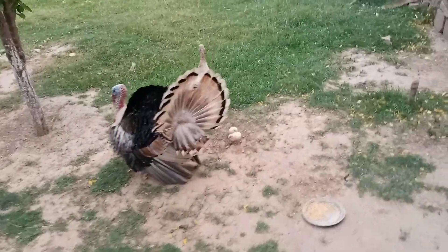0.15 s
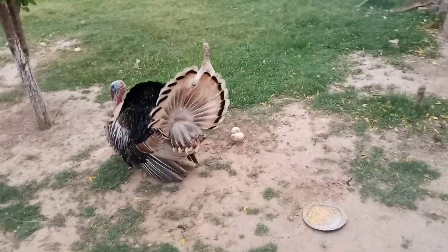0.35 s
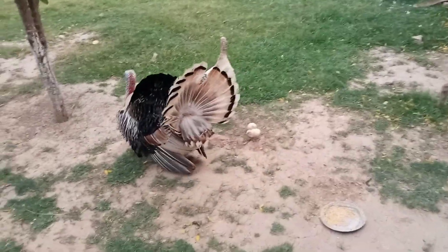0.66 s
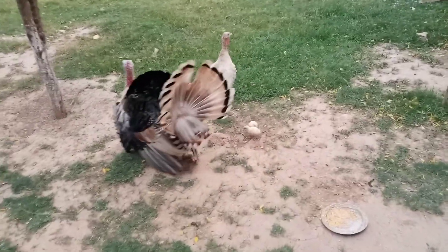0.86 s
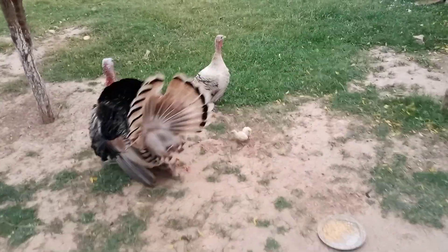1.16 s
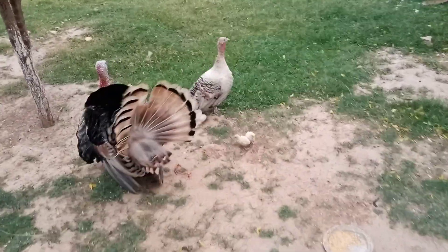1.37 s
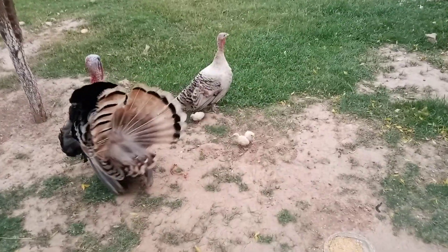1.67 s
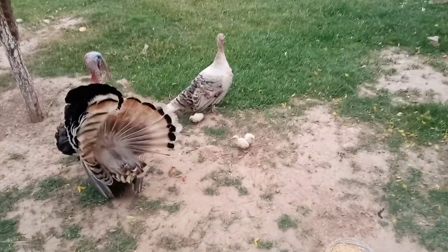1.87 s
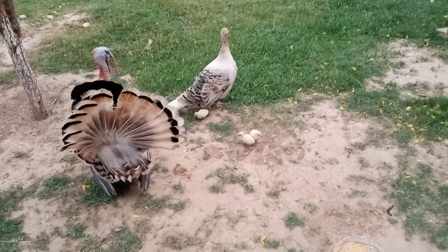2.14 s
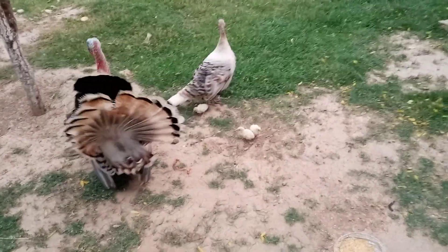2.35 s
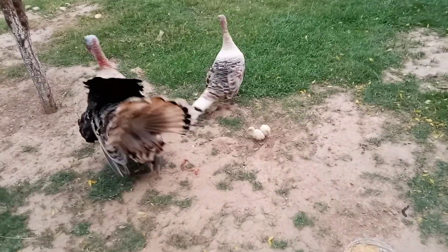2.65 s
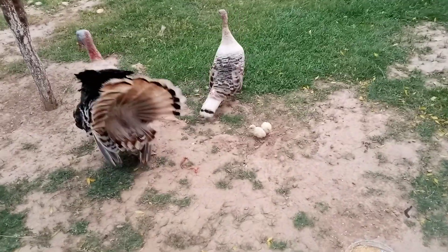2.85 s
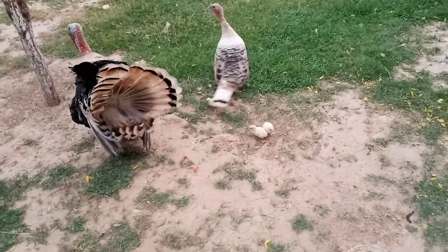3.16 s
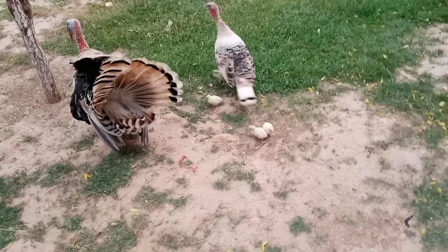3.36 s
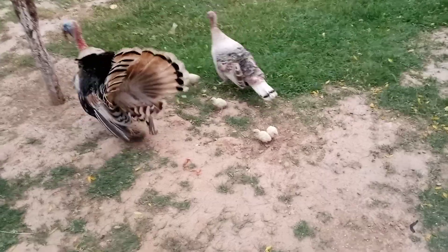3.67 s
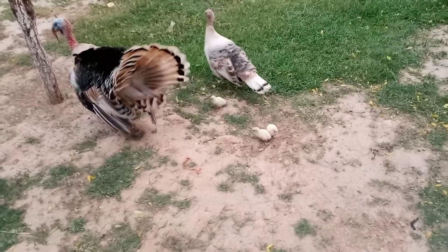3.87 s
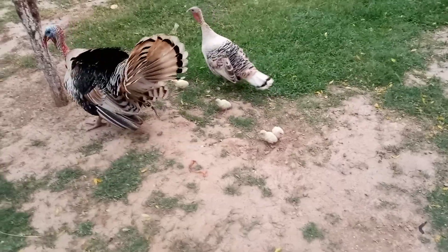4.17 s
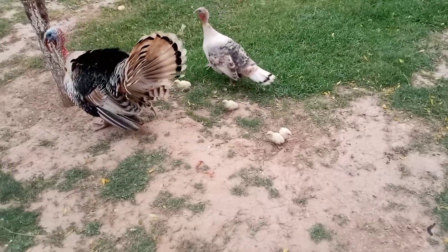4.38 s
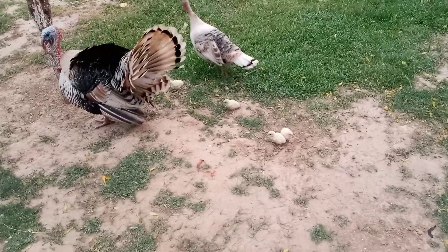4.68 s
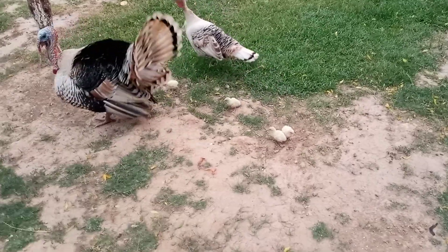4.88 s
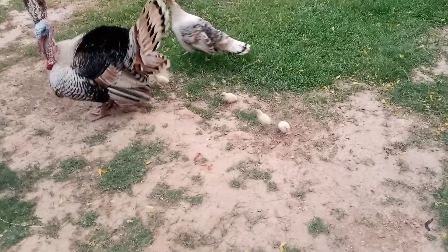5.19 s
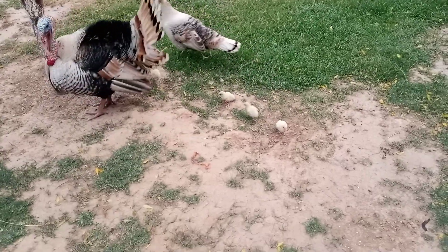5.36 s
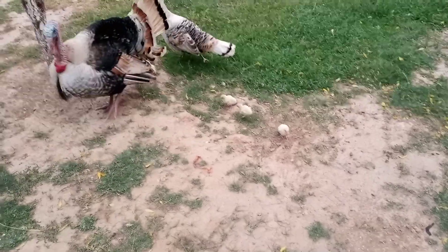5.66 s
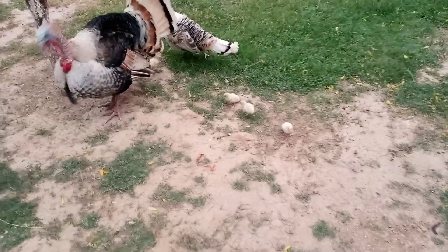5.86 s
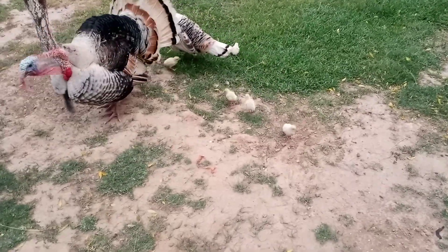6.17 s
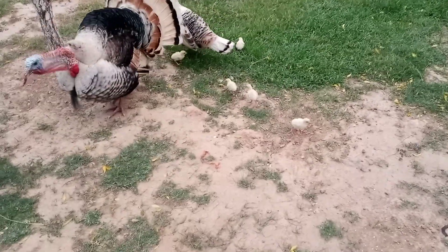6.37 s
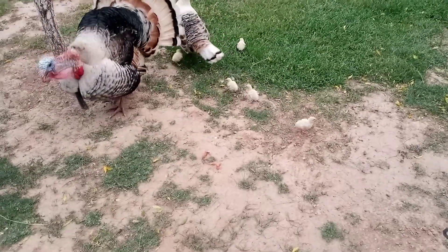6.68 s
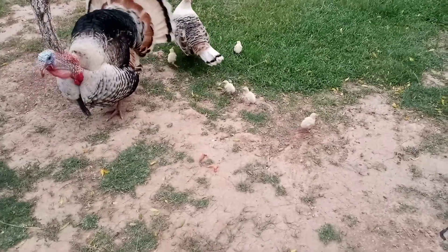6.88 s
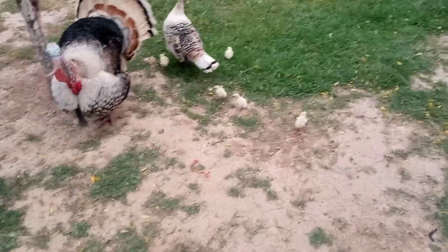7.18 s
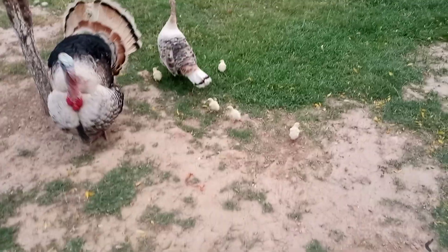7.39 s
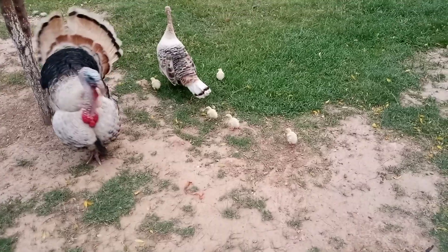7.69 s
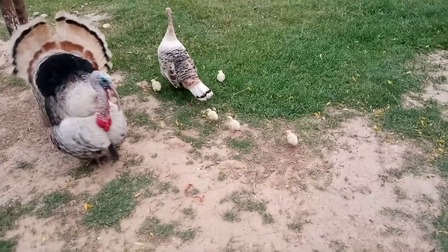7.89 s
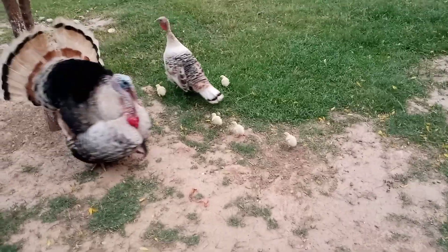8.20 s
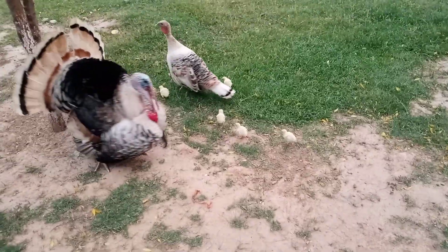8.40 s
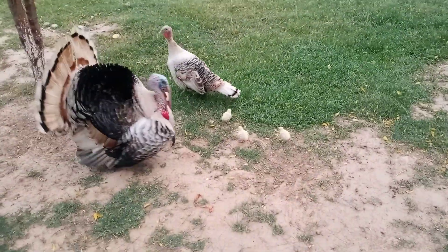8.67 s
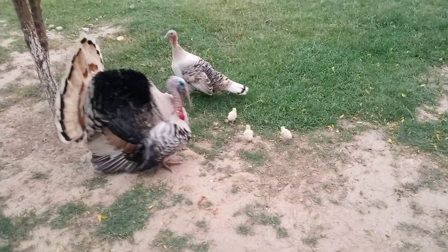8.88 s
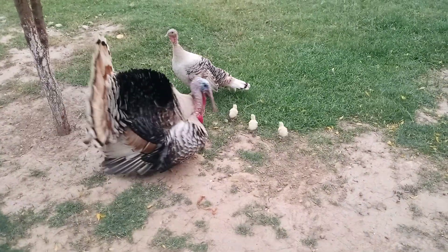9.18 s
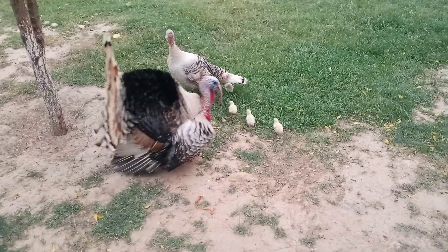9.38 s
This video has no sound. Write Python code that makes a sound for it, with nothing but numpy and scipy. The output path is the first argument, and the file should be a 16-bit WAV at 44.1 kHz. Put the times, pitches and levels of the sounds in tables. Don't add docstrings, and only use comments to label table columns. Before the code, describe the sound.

Farmyard hush with faint bird chirps and wind buffets; chicks peep, a hen yelps faster, a turkey gobbles loudly once, then scattered yelps follow.

```python
import sys
import numpy as np
from scipy import signal
from scipy.fft import rfft, irfft, next_fast_len
from scipy.io import wavfile
from scipy.ndimage import uniform_filter1d, map_coordinates

SR = 44100
rng = np.random.default_rng(int(sys.argv[2]) if len(sys.argv) > 2 else 0)


def pcm_store(signal):
    levels = np.round(np.clip(np.atleast_2d(signal), -1, 1) * 32767)
    wavfile.write(sys.argv[1], SR, levels.astype(np.int16).T)


def level_to_linear(level):
    exponent = np.asarray(level, float) / 20
    return 10 ** exponent


N = 420713


def unit(x):
    return x / np.sqrt(np.mean(np.abs(x) ** 2) + 1e-20)


def along(points, hz):
    f, v = np.transpose(points)
    return np.interp(np.log(hz + 1), np.log(f + 1), v)


def curves(rows, start=0, count=N):
    s, *columns = np.transpose(rows)
    t = (start + np.arange(count)) / SR
    return [np.interp(t, s, column) for column in columns]


def wobble(rate, count=N):
    knots = rng.standard_normal(int(count * rate / SR) + 4)
    return map_coordinates(knots, [1 + np.arange(count) * rate / SR])


def cycles(hz):
    return 2 * np.pi * np.cumsum(hz) / SR


def noise(spectrum):
    m = next_fast_len(N)
    hz = np.fft.rfftfreq(m, 1 / SR)
    inside = (hz >= spectrum[0][0]) & (hz <= spectrum[-1][0])
    white = rfft(rng.standard_normal(m))
    return unit(irfft(white * level_to_linear(along(spectrum, hz)) * inside, m)[:N])


def swells(rows):
    t = np.arange(N) / SR
    total = np.zeros(N)
    for s, rise, db, t60 in rows:
        total += level_to_linear(db - np.where(t < s, 20 * (s - t) / rise, 60 * (t - s) / t60))
    return total


def puffs(rows, spectrum):
    return noise(spectrum) * swells(rows)


def note(rows, edge):
    start, count = round(rows[0][0] * SR), round((rows[-1][0] - rows[0][0]) * SR)
    t = np.arange(count) / SR
    return start, np.clip(np.minimum(t, t[::-1]) / edge, 0, 1), curves(rows, start, count)


def bells(rows):
    lead, rise, fall = .2, .72, 1.15
    for s, width, db, *rest in rows:
        span = slice(round((s - 4 * width) * SR), round((s + 4 * width) * SR))
        u = (np.arange(span.start, span.stop) / SR - s) / width
        gain = level_to_linear(db) * np.exp(-.5 * ((u + lead) / np.where(u < -lead, rise, fall)) ** 2)
        yield span, u, gain, rest


def partial(phase, rough, smear_hz):
    fuzz = wobble(smear_hz, len(phase)) + 1j * wobble(smear_hz, len(phase))
    return np.real((np.sqrt(2 - 2 * rough) + np.sqrt(rough) * fuzz) * np.exp(1j * phase))


def whistles(tables, rough, smear_hz, edge):
    out = np.zeros(N)
    for rows in tables:
        start, window, (hz, db) = note(rows, edge)
        phase = cycles(hz * (1 + .007 * wobble(90, len(hz))))
        out[start:start + len(hz)] += window * level_to_linear(db) * partial(phase, rough, smear_hz)
    return out


def glides(rows):
    return [[(s, first, db), (s + length, last, db)] for s, length, first, last, db in rows]


# frequency in Hz, t60 in seconds.
WALL_DECAY = [(500, 0.38), (2000, 0.4), (8000, 0.2)]


def walls(x, delay):
    hz, t, z = signal.stft(rng.standard_normal(SR // 2), SR, nperseg=256)
    decay = level_to_linear(-60 * t / along(WALL_DECAY, hz)[:, None])
    tail = signal.istft(z * decay, SR, nperseg=256)[1]
    delayed = np.pad(x, (round(delay * SR), 0))
    return signal.fftconvolve(delayed, tail / np.linalg.norm(tail))[:N]


# time in seconds, hush in dB, treble in dB.
YARD_LEVEL = [(0, -55.5, -98), (.49, -54, -92), (.52, -55.5, -76), (5.4, -56.5, -74), (9.54, -55.5, -73)]
# frequency in Hz, density in dB per Hz.
HUSH_COLOUR = [(24, -31.5), (40, -18), (69, -3), (134, 0), (501, -5), (756, -4.5), (1350, -6), (2330, -3.5),
               (3150, -9), (4170, -8.5), (7000, -14.5), (9100, -73), (15400, -120)]
# frequency in Hz, level in dB.
TREBLE_COLOUR = [(6500, 5.5), (7000, -2), (7600, -1.5), (8000, -14.5), (8500, -34)]


def yard():
    hush_db, treble_db = curves(YARD_LEVEL)
    hush = level_to_linear(hush_db + .7 * wobble(7)) * noise(HUSH_COLOUR)
    treble = level_to_linear(treble_db + 2.5 + 1.1 * wobble(1.9)) * noise(TREBLE_COLOUR)
    return hush + treble


# peak time in seconds, rise in seconds, level in dB, t60 in seconds.
GUST_SWELLS = [(.5, .02, -59, 0.65), (1.3, 0.047, -55.5, 0.55), (2.25, 0.075, -38.5, 0.63),
               (2.6, .05, -59, 0.13), (3.11, 0.011, -31.5, 0.12), (3.23, 0.042, -38, 0.1),
               (3.65, 0.3, -50.5, 0.29), (3.81, 0.22, -48, .1), (3.955, 0.044, -50, 0.1),
               (4.22, 0.13, -37, 0.2), (4.37, 0.063, -53, 0.12), (2.85, 0.089, -65, 0.18),
               (4.8, 0.065, -42, 0.26), (4.97, 0.15, -46.5, 0.82), (6.42, 0.33, -57.5, 0.54),
               (7.28, 0.099, -35, 0.22), (7.6, 0.27, -51, 0.4), (7.92, 0.041, -32, 0.23),
               (8.06, 0.044, -35, 0.82), (8.22, 0.11, -41.5, 0.13), (8.5, .05, -48.5, 0.12),
               (8.96, 0.07, -50, 0.17)]
# frequency in Hz, level in dB.
BUFFET_COLOUR = [(25, -41.5), (50, -4), (98, -0.5), (170, -9.5), (260, -27), (400, -48)]
# frequency in Hz, level in dB.
EDGE_COLOUR = [(110, -44.5), (180, -2.5), (280, -1.5), (450, -14), (700, -27.5)]


def gusts():
    breeze_db = -68
    buffet_db = 20 * np.log10(level_to_linear(breeze_db + 5.7 * wobble(2.074)) + swells(GUST_SWELLS))
    lumps = level_to_linear(1.9 * wobble(25))
    edge = unit(lumps * level_to_linear(5.15 * wobble(40)) * noise(EDGE_COLOUR))
    edge_gain = level_to_linear(-8.5 + 0.42 * (buffet_db + 47.5))
    return level_to_linear(buffet_db - 2) * (unit(lumps * noise(BUFFET_COLOUR)) + edge_gain * edge)


# time in seconds, peak in dB, pitch in Hz.
PUSHES = [(0.503, -39, 152), (2.222, -31, 192), (2.258, -34, 182), (2.297, -31.5, 180),
              (2.333, -35.5, 132), (2.354, -40, 138), (2.385, -31.5, 107), (2.436, -38, 114),
              (2.467, -39, 105), (2.597, -40, 102), (3.114, -26, 179), (3.22, -32, 214), (3.62, -38, 108),
              (3.64, -34, 146), (3.952, -40, 151), (4.193, -40, 128), (4.215, -26.5, 138),
              (4.235, -31.5, 119), (4.353, -41, 121), (4.775, -39, 113), (4.808, -34.5, 226),
              (4.883, -35.5, 105), (4.921, -38, 107), (4.963, -33, 202), (5.0, -41, 97), (7.229, -36, 126),
              (7.249, -31, 148), (7.276, -34.5, 137), (7.587, -37, 114), (7.641, -39.5, 98),
              (7.868, -34, 111), (7.9, -27, 152), (7.93, -24.5, 157), (7.965, -34, 221), (7.992, -38, 92),
              (8.055, -27.5, 174), (8.088, -32, 139), (8.125, -30, 134), (8.162, -29, 161),
              (8.188, -31, 168), (8.212, -29.5, 136), (8.259, -41, 262), (8.381, -41, 132),
              (5.63, -37, 390),
    (8.4, -46, 180),
    (6.5, -44.5, 140),
    (6.1, -40, 240),
    (2.86, -49, 95),
    (2.0, -50, 83),
]


def thumps():
    spike_cycles, boom_hz, boom_s = 0.46, 98, 0.01
    out = np.zeros(N)
    t = np.arange(-SR // 20, SR // 20) / SR
    for s, db, hz in PUSHES:
        turns = rng.uniform(0, 2 * np.pi, 3)
        front = np.exp(-.5 * (t * hz / spike_cycles) ** 2) * np.sin(2 * np.pi * 1.075 * hz * t + turns[0])
        crack = np.exp(-.5 * (t * hz * 1.4 / spike_cycles) ** 2)
        crack *= np.sin(2 * np.pi * 2.02 * hz * t + turns[2])
        crack_gain = level_to_linear(-13) * min(hz / 180, 1) ** 2
        boom = np.exp(-.5 * (t / boom_s) ** 2) * np.sin(2 * np.pi * boom_hz * t + turns[1])
        push = front + crack_gain * crack + level_to_linear(-7.5) * (hz < 300) * boom
        out[round(s * SR) - SR // 20:][:len(t)] += level_to_linear(db - 2.0) * push
    return out


# frequency in Hz, level in dB.
SLAP_COLOUR = [(50, 5), (350, 4.5), (2000, -2.5), (5000, -8.5), (6700, -3.5), (8400, -33)]
# peak time in seconds, rise in seconds, level in dB, t60 in seconds.
RUSTLE_SWELLS = [(3.33, 0.011, -52, 0.47), (3.42, 0.037, -57.5, 0.39), (3.74, 0.071, -53.5, 0.4),
                 (5.292, 0.0005, -39, 0.016), (5.4, 0.001, -55, .02), (5.415, 0.0013, -47.5, .02),
                 (5.47, 0.083, -52, 0.59), (5.63, 0.012, -46.5, 0.14), (9.19, 0.0011, -51, 0.015),
                 (3.502, .003, -49, .04), (3.9, 0.011, -52.5, .2)]
# frequency in Hz, level in dB.
DOWN_COLOUR = [(2500, -12), (4500, 0.5), (6500, -4), (8300, -28)]


def feathers():
    return puffs([(.5, 0.0013, -41.0, 0.34)], SLAP_COLOUR) + puffs(RUSTLE_SWELLS, DOWN_COLOUR)


# time in seconds, level in dB, first pitch in Hz.
RISING_CALLS = [(.2, -59, 3350), (.51, -57, 3350), (.83, -61, 3350), (2.12, -64, 3200), (2.77, -62, 3200),
                (2.95, -60, 3600), (2.92, -69, 6600), (9.22, -64, 3100)]
# time in seconds, level in dB, first pitch in Hz.
FALLING_CALLS = [(.78, -59, 5400), (1.095, -67, 7400), (1.51, -61, 4900), (2.39, -62, 5200),
                 (2.74, -66, 6800), (3.1, -62, 5300), (3.9, -57, 5600), (6.88, -56, 5300),
                 (7.17, -63, 4400), (8.8, -63, 5200), (9.03, -57, 5450), (9, -62, 3700)]
# time in seconds, level in dB, first pitch in Hz.
LEVEL_CALLS = [(1.19, -63, 3600), (1.41, -66, 7100), (1.45, -64, 3500), (1.82, -61, 3620),
               (2.42, -62, 3600), (2.69, -65, 6550), (3.13, -62, 3600), (7.82, -61, 4400),
               (7.88, -64, 3450), (8.02, -64, 4600), (8.29, -63, 4650), (8.6, -63, 4750), (8.61, -65, 7050),
               (8.94, -65, 7050), (8.94, -63, 3520), (9.23, -65, 7350), (9.27, -62, 3680),
               (4.74, -62, 4300), (4.79, -62, 4150), (4.84, -60, 3900), (.27, -64, 3950)]


def sparrows():
    shapes = [(.08, 1.2, RISING_CALLS), (.055, .74, FALLING_CALLS), (.06, 1.01, LEVEL_CALLS)]
    rows = []
    for length, bend, calls in shapes:
        rows += [(s, length, hz, bend * hz, db) for s, db, hz in calls]
    early_db = 7 * (np.arange(N) < 1.7 * SR)
    chatter = level_to_linear(-75 + early_db + 4 * wobble(14)) * noise([(3000, -19.5), (3700, 0), (5400, -15)])
    return whistles(glides(rows), rough=.65, smear_hz=380, edge=.004) + chatter


# start in seconds, length in seconds, level in dB, pitch in Hz, closing plunge in Hz.
NEAR_PEEPS = [
    (3.255, 0.086, -51, 4480, 30),
    (3.45, 0.058, -43, 5080, 2210),
    (3.682, 0.16, -46, 4830, 1430),
    (4.011, .16, -45, 4800, 1290),
    (4.388, .14, -47.5, 4885, 1400),
    (5.161, 0.083, -46, 4620, 30.3),
]


def peeps():
    plunge_s, under = 0.037, 0.845
    for s, length, db, hz, plunge_hz in NEAR_PEEPS:
        t = np.linspace(0, length, num=40)
        end = np.clip(1 + (t - length) / plunge_s, 0, 1)
        level = db - 9.5 * (1 - np.minimum(t / (length - plunge_s), 1)) - 12 * end ** 2
        climb_hz = -302.5 * np.exp(-t / 0.04)
        sag_hz = 120.4 * (t / length) ** 3
        yield np.transpose([s + t, hz + climb_hz - sag_hz - plunge_hz * end ** 1.8, level])
        for k, under_db in [(1, db - 12.5), (2, db - 41.5)]:
            strand_hz = k * under * hz
            yield [(s + 0.019, strand_hz, under_db), (s + length - plunge_s / 2, strand_hz, under_db)]


# start in
# seconds, length in seconds, first and last pitch in Hz, level in dB.
SIDE_STRANDS = [(3.6, .091, 3751, 4051, -56.5), (3.63, .06, 4400, 4400, -59), (3.35, .09, 4900, 4900, -59),
                (3.35, .121, 6701, 6851, -49.5), (3.7, .101, 6401, 6401, -63),
                (4.055, .081, 6051, 6031, -54.5), (4.05, .091, 6751, 6651, -60),
                (3.42, .041, 7001, 7701, -61), (4.518, .022, 6000, 4200, -60),
                (3.39, .07, 7700, 7900, -63), (4.89, .071, 651, 641, -56.5),
                (6.76, .021, 4701, 4601, -57.5), (5.41, .031, 2681, 2651, -55.5),
                (5.5, .061, 3801, 3701, -58.5), (3.44, .03, 4500, 4600, -53),
                (3.465, .03, 4300, 4400, -54), (4.115, .03, 4900, 4900, -52), (9.42, .04, 1150, 1080, -54),
                (4.685, .03, 1250, 1050, -50), (5.57, .025, 1150, 950, -52)]


def chicks():
    near = whistles(peeps(), rough=0.19, smear_hz=205.5, edge=0.0037)
    return near + whistles(glides(SIDE_STRANDS), rough=0.31, smear_hz=417, edge=0.0072)


# time in seconds, pitch in Hz, level in dB.
SLIDING_YELPS = [
    [(2.85, 923, -53), (2.86, 923, -55), (2.874, 1148, -54.5), (2.9, 1127, -60), (2.946, 1003, -46),
     (2.962, 872, -44), (3.032, 783, -46.5), (3.07, 820, -75)],
    [(4.19, 870, -56), (4.2, 879, -49.5), (4.25, 944, -43.5), (4.282, 867, -41.5), (4.3, 892, -41),
     (4.33, 824, -42.5), (4.358, 822, -43), (4.385, 854, -62)],
    [(4.55, 896, -56), (4.56, 900, -47), (4.568, 1054, -46), (4.582, 1048, -39.5), (4.606, 908, -37.5),
     (4.63, 836, -38.5), (4.68, 846, -36), (4.71, 786, -51)],
    [(7.09, 935, -46), (7.098, 928, -45), (7.108, 1173, -50), (7.136, 1074, -41), (7.174, 870, -34.5),
     (7.208, 822, -36), (7.252, 790, -44.5), (7.27, 864, -68)],
    [(7.47, 1073, -45), (7.482, 1180, -52), (7.5, 1114, -42), (7.528, 987, -32.5), (7.54, 886, -32.5),
     (7.574, 823, -36.5), (7.598, 763, -47.5), (7.61, 850, -61)],
    [(7.92, 1121, -48), (7.946, 1120, -46.5), (7.976, 1004, -35.5), (7.99, 895, -35), (8.004, 844, -36),
     (8.04, 784, -43.5), (8.065, 765, -54)],
    [(9.29, 930, -47), (9.298, 932, -49.5), (9.346, 904, -48.5), (9.382, 832, -42), (9.418, 816, -41),
     (9.444, 733, -50.5), (9.46, 730, -66)],
]
# time in seconds, pitch in Hz, level in dB.
COVERED_YELP = [(6.245, 1155, -47), (6.275, 1058, -42), (6.3, 983, -36.5), (6.325, 871, -35),
                (6.36, 858, -39), (6.385, 800, -41)]
# time in seconds, pitch in Hz, level in dB.
HELD_YELPS = [
    [(4.843, 896, -42), (4.853, 896, -41.5), (4.871, 905, -35), (4.931, 885, -31), (4.963, 955, -34.5),
     (4.973, 893, -32), (4.985, 760, -48), (4.995, 779, -62)],
    [(5.14, 896, -44), (5.148, 863, -44), (5.158, 892, -35), (5.194, 881, -34.5), (5.242, 952, -31.5),
     (5.254, 857, -40.5), (5.272, 884, -48)],
    [(5.455, 910, -57), (5.463, 914, -42.5), (5.485, 914, -36.5), (5.497, 887, -36), (5.529, 885, -33.5),
     (5.557, 893, -39.5), (5.569, 825, -37), (5.577, 810, -52), (5.585, 930, -48)],
]
# sliding, covered, then held, in dB.
YELP_SECOND_DB = [-20, -15, -9.5, -19, -19, -16.5, -14, -17, -18, -13, -10]


def yelps():
    sliding = SLIDING_YELPS + [COVERED_YELP]
    tones = [(-12, -15)] * len(sliding) + [(-8, -28)] * len(HELD_YELPS)
    for rows, second_db, (third_db, break_db) in zip(sliding + HELD_YELPS, YELP_SECOND_DB, tones):
        yield rows, second_db, third_db, break_db


def hen():
    break_hz, scrape_s = 1205, 0.025
    out = np.zeros(N)
    for rows, second_db, third_db, break_db in yelps():
        start, window, (hz, db) = note(rows, edge=0.0054)
        count = len(hz)
        phase = cycles(hz * (1 + 0.0082 * wobble(66.4, count)))
        sink = level_to_linear(-.09 * np.maximum(hz - 910, 0))
        second = level_to_linear(second_db) * partial(2 * phase, 0.24, 90.3)
        third = level_to_linear(second_db + third_db) * sink * partial(3 * phase, 0.18, 110)
        voice = partial(phase, 0.017, 120) + sink * (second + third)
        late = np.linspace(0, 1, count) ** 4.4
        broken = partial(2 * np.pi * break_hz * np.arange(count) / SR, 0.84, 100)
        voice += level_to_linear(break_db + 10.5) * late * broken
        left = np.arange(count)[::-1] / SR
        scrape = partial(1.3 * phase, 1.0, 900) + 0.79 * partial(2 * phase, 0.75, 900)
        scrape *= level_to_linear(np.max(db) - 18) * np.exp(-left / scrape_s)
        out[start:start + count] += window * (level_to_linear(db) * voice + scrape)
    return out


# time in seconds, width in seconds, level in dB, pitch in Hz.
CLUCK_NOTES = [(5.857, 0.0039, -34, 1149), (5.986, 0.012, -32.5, 1115), (6.1036, 0.0061, -32.5, 1018),
               (6.154, 0.0058, -29.5, 993), (6.3076, 0.0039, -46.5, 1363), (6.3694, 0.0043, -30, 1007),
               (6.384, 0.0038, -31, 880), (6.396, 0.006, -23, 1007), (6.462, 0.0092, -44.5, 936),
               (6.4868, 0.0057, -43, 950), (6.5329, 0.0068, -38, 955), (6.5718, 0.0065, -40.5, 1350),
               (6.7, 0.009, -42, 893), (6.72, .006, -39, 872), (6.754, 0.009, -43, 1257)]


def clucks():
    octave_from_hz = 1198
    out = np.zeros(N)
    for span, u, gain, (hz,) in bells(CLUCK_NOTES):
        high = hz > octave_from_hz
        swoops = hz < octave_from_hz and len(u) < 8 * .008 * SR
        swoop_hz = 44.8 * swoops * np.clip(.3 - u, 0, 2) ** 2
        arch_hz = 22 * high * np.minimum((u + 0.25) ** 2, 6)
        octave_db = -15 + 0.1354 * max(hz - octave_from_hz, 0)
        phase = cycles(hz + swoop_hz - arch_hz)
        tone = partial(phase, 0.43, smear_hz=156.0)
        tone += level_to_linear(octave_db) * partial(2 * phase, .3, smear_hz=198)
        tone += level_to_linear(-23) * partial(3 * phase, 0.71, smear_hz=300)
        tone += level_to_linear(-24) * partial(4 * phase, 0.85, smear_hz=395)
        out[span] += gain * tone
    return out


# time in seconds, roughness from 0 to 1.
ROUGHNESS = [(5.68, .25), (5.78, .1), (5.8, .6), (5.86, .48), (5.99, .45), (6.01, .08), (6.05, .08),
             (6.08, .45), (6.8, .5)]
# time in seconds, width in seconds, level in dB, pitch in Hz.
THROAT_PULSES = [(5.68, 0.0067, -35, 605), (5.72, .01, -43, 703), (5.771, 0.014, -35.5, 658),
                 (5.797, 0.01, -30.5, 744.5), (5.814, 0.0049, -23, 717), (5.836, 0.0075, -39, 725.6),
                 (5.862, 0.0046, -26, 729), (5.876, 0.0032, -30, 687), (5.913, 0.0043, -24, 723.4),
                 (5.927, 0.0026, -27, 712.3), (5.958, 0.0037, -26.5, 742), (5.972, 0.0042, -38, 738),
                 (5.997, 0.01, -28.5, 600.8), (6.0357, 0.017, -25.5, 663.4), (6.051, 0.0074, -21.5, 686.5),
                 (6.1147, 0.0047, -32.5, 594), (6.171, 0.0074, -38, 648), (6.257, 0.0064, -30.5, 602.6),
                 (6.273, 0.0071, -30, 607), (6.33, 0.0057, -31, 594), (6.468, 0.0068, -40, 621),
                 (6.49, 0.0039, -36.5, 600), (6.544, 0.0085, -47.5, 598), (6.697, 0.0033, -38, 601),
                 (6.72, 0.0069, -38, 596)]
# time in seconds, width in seconds, level in dB, pitch in Hz, mouth resonance in Hz.
BEAK_BURSTS = [(5.66, .017, -47.5, 607, 1380), (5.68, 0.0045, -18, 604.3, 2040),
               (5.689, .003, -29.5, 599, 2700), (5.7146, 0.0024, -28, 679, 1390),
               (5.725, 0.0068, -31, 698, 1390), (5.763, 0.005, -17.5, 611.4, 2020),
               (5.77, .004, -24.5, 640.6, 1900), (5.7804, .0042, -15, 660, 1310),
               (5.792, .003, -27, 682, 1350), (5.806, 0.013, -34.5, 728.6, 1900),
               (5.858, .009, -30.5, 616.3, 1900), (5.897, .0036, -27.5, 591, 1780),
               (5.903, 0.0035, -37.5, 688.5, 3450), (5.912, .005, -36.5, 700, 4150),
               (5.919, .011, -35, 707.5, 1900), (5.954, .007, -30.5, 704, 2470),
               (5.979, 0.0065, -23.5, 612.7, 1230), (5.995, 0.007, -25, 623.5, 2000),
               (6.036, 0.0062, -34, 679, 5350), (6.036, .014, -21, 668.4, 2300),
               (6.034, .014, -27, 667, 1330), (6.1, .005, -39, 639, 1957), (6.156, .008, -39, 706.4, 2800),
               (6.167, 0.0058, -37, 688, 1432), (6.264, 0.011, -42, 660, 2700),
               (6.322, 0.0095, -46, 595, 1759), (6.376, .01, -39.5, 695, 1960),
               (6.3966, 0.00474, -35.5, 684, 2740), (6.531, .0086, -44, 646, 1880),
               (6.28, 0.01, -55.5, 640, 3900), (6.313, 0.0021, -44, 700, 2100),
               (6.36, 0.0037, -48, 675, 4700), (6.52, .004, -45.5, 680, 2720),
               (6.715, .005, -50, 680, 2680)]
# time in seconds, pitch in Hz.
PITCH_BENDS = [(5.673, 643.7), (5.692, 584.4), (5.709, 698), (5.735, 694), (5.752, 599), (5.79, 715),
               (5.825, 677.5), (5.834, 743.4), (5.878, 680.4), (5.945, 774), (5.974, 717.4), (6.069, 670),
               (6.106, 692.5), (6.126, 595.5), (6.25, 634), (6.285, 599)]
# frequency in Hz, level in dB.
NECK_COLOUR = [(3300, 1), (5500, -10), (6900, 1), (8000, -16), (8600, -32)]


def beak_bursts(phase, hz, rough):
    out, k = np.zeros(N), np.arange(2, 14)[:, None]
    lag = rng.normal(0, .5, size=14)
    for span, _, gain, (_, mouth_hz) in bells(BEAK_BURSTS):
        burst_ms = 125 * len(gain) / SR
        elapsed_s = span.start / SR - BEAK_BURSTS[0][0]
        rasp_db = -33 + 26 * rough[span].mean() + 1.05 * burst_ms - 6 * elapsed_s
        tones = []
        for j in k[:, 0]:
            share = np.minimum(rough[span] * 0.2 * j, .95)
            tones.append(partial(j * phase[span] + lag[j], share, smear_hz=487))
        overtone_hz = k * hz[span]
        mouth = 1 / (1 + ((overtone_hz - mouth_hz) / 400) ** 4) + 0.25 / (1 + (overtone_hz / 3200) ** 12)
        scatter = level_to_linear(rng.normal(0, 3.9, k.shape) + along(NECK_COLOUR, overtone_hz)) * (k >= 5)
        shape = mouth / np.sqrt(np.sum(mouth ** 2, 0))
        shape = shape + level_to_linear(rasp_db) * scatter / np.sqrt(np.sum(scatter ** 2, 0))
        out[span] += gain * np.sum(shape * np.array(tones), 0)
    return out


def gobble():
    throat_pitch = [(row[0], row[3]) for row in THROAT_PULSES]
    beak_pitch = [(row[0], row[3]) for row in BEAK_BURSTS]
    hz, = curves(sorted(throat_pitch + beak_pitch + PITCH_BENDS))
    low_hz, = curves(sorted(throat_pitch + PITCH_BENDS))
    rough, = curves(ROUGHNESS)
    low = cycles(low_hz * (1 + .01 * wobble(150)))
    phase = cycles(hz * (1 + .03 * rough * wobble(160)))
    power = np.zeros(N)
    for span, _, gain, _ in bells(THROAT_PULSES):
        power[span] += gain ** 2
    throat = partial(low, .2 * rough, smear_hz=127.1) + level_to_linear(-10.5) * rough * partial(low, 0.64, smear_hz=700)
    hum = partial(2 * np.pi * 77.3 * np.arange(N) / SR, 0.79, smear_hz=45)
    chest = level_to_linear(-50.5) * uniform_filter1d(power ** 0.057, size=1200) * hum
    return beak_bursts(phase, hz, rough) + chest + np.sqrt(power) * throat


def scene():
    air = yard() + gusts() + thumps() + feathers()
    far = sparrows()
    flock = chicks() + hen()
    cock = clucks() + gobble()
    echo = level_to_linear(-4.0) * walls(far, delay=.01)
    echo += level_to_linear(-14) * walls(flock, delay=.015)
    echo += level_to_linear(-15.0) * walls(cock, delay=0.014)
    return (cock + flock + far + echo + air)[None]


def low_pass(x):
    return signal.sosfilt(signal.butter(12, 8510, fs=SR, output="sos"), x)


def record(dry):
    low_cut_hz, top_hz = 29, 8500
    soft = dry / (1 + np.abs(dry / .33) ** 4) ** .25
    hz = np.fft.rfftfreq(N, 1 / SR)
    spectrum = rfft(soft) * (hz < top_hz) * hz ** 2 / (hz ** 2 + low_cut_hz ** 2)
    mix = irfft(spectrum, N) + level_to_linear(-99) * rng.standard_normal(dry.shape)
    return low_pass(mix)


dry = scene()
out = record(dry)
pcm_store(out)
```